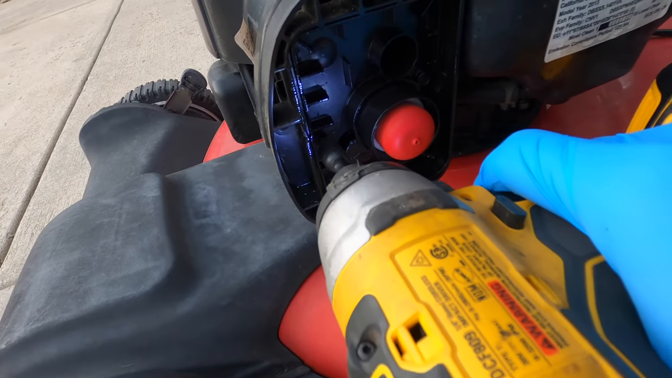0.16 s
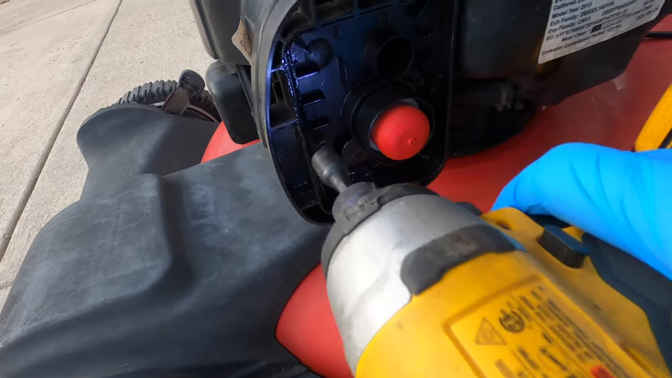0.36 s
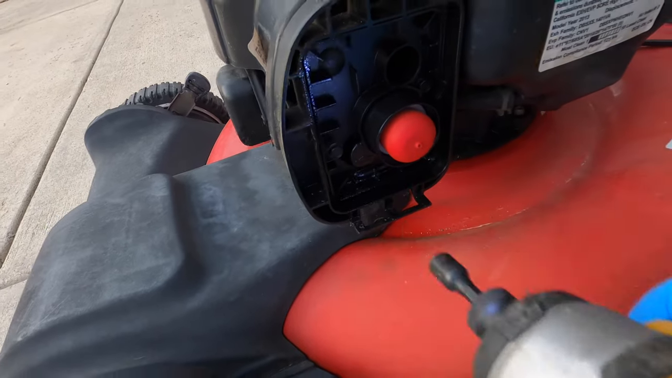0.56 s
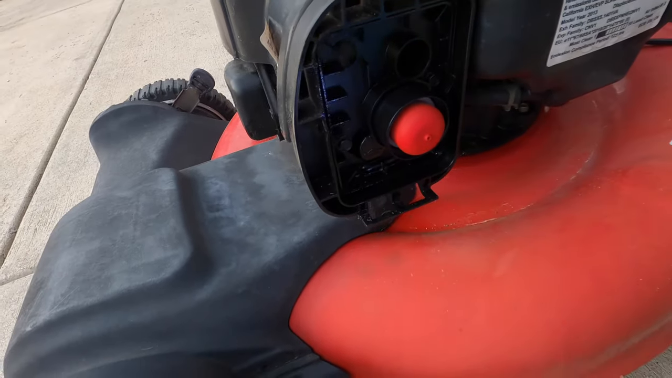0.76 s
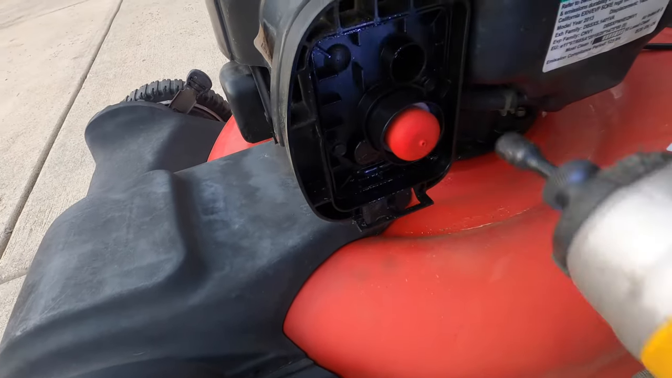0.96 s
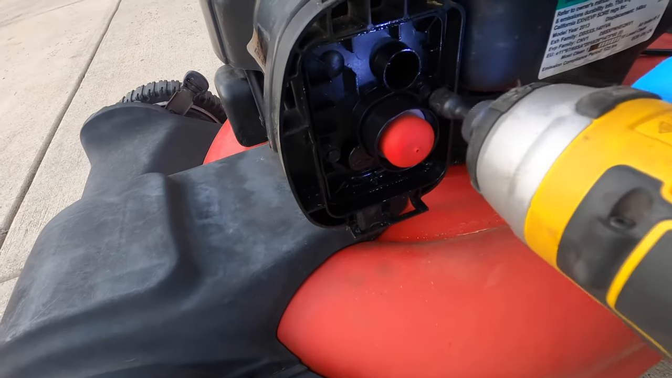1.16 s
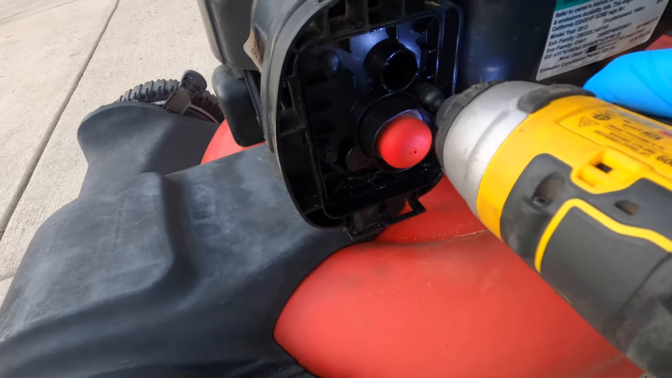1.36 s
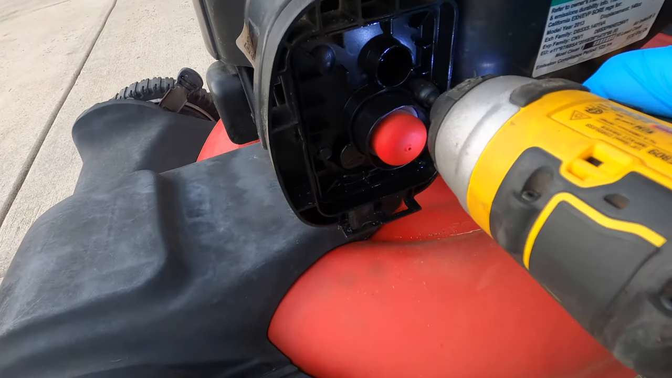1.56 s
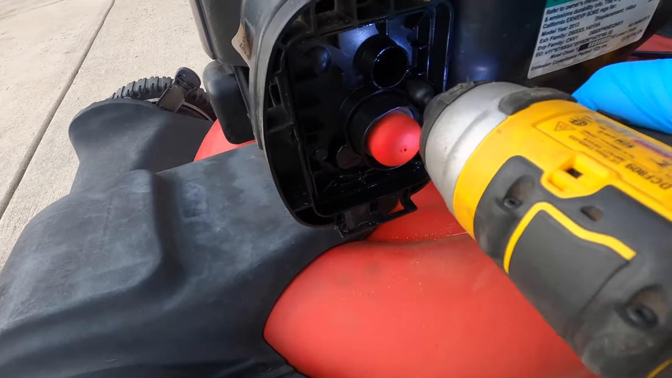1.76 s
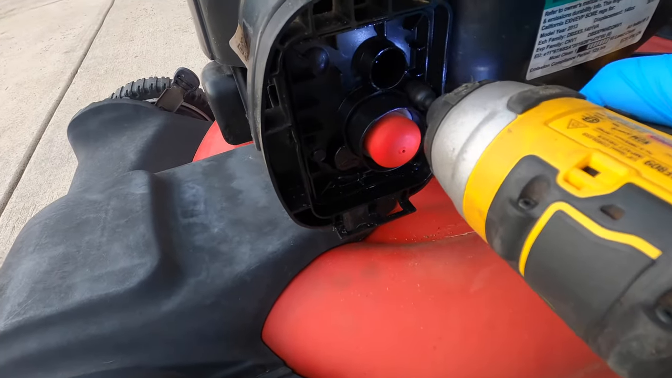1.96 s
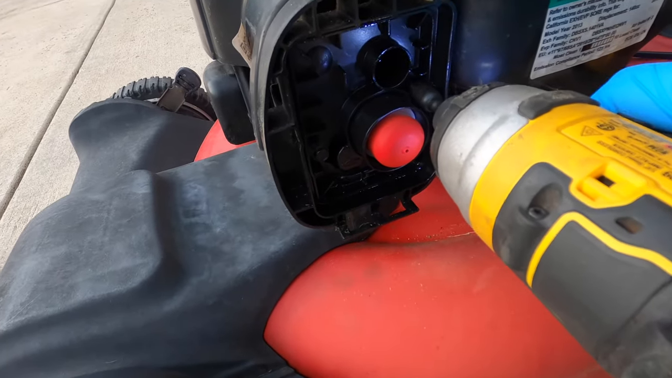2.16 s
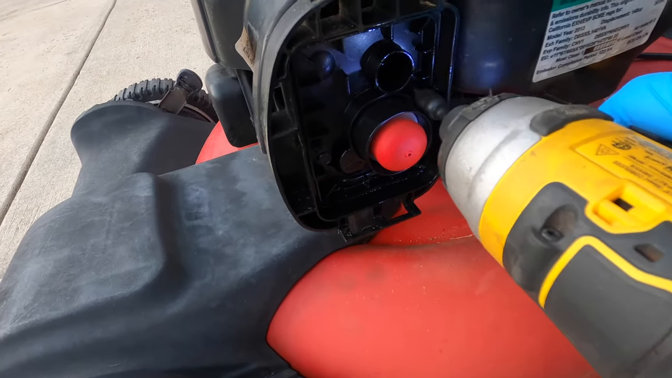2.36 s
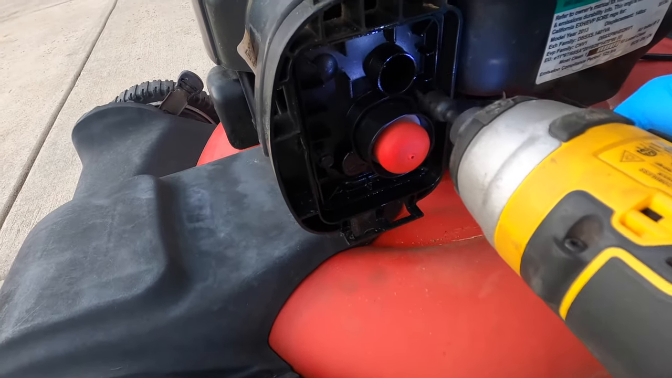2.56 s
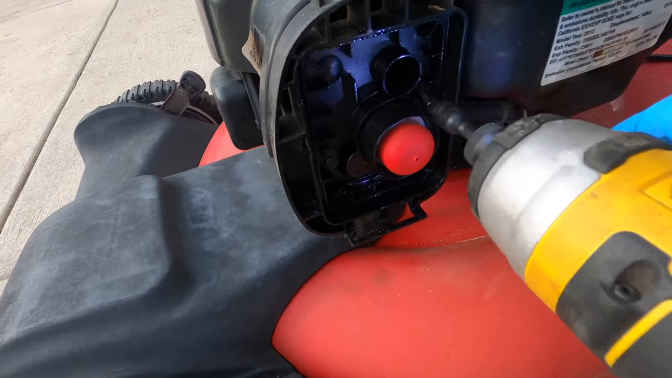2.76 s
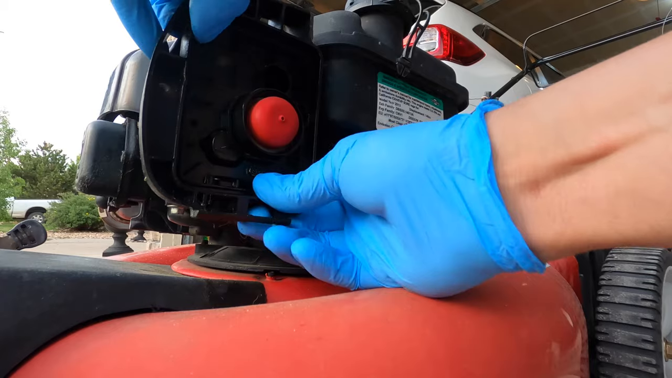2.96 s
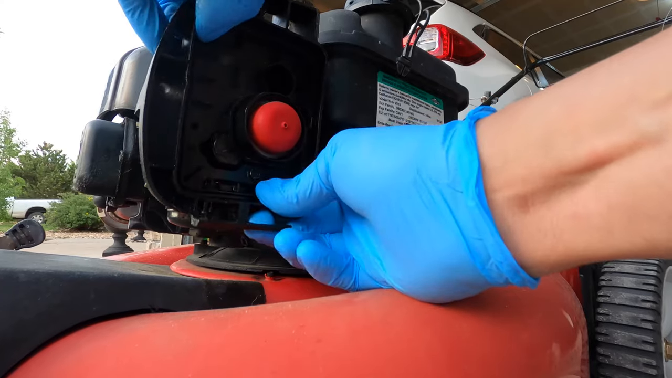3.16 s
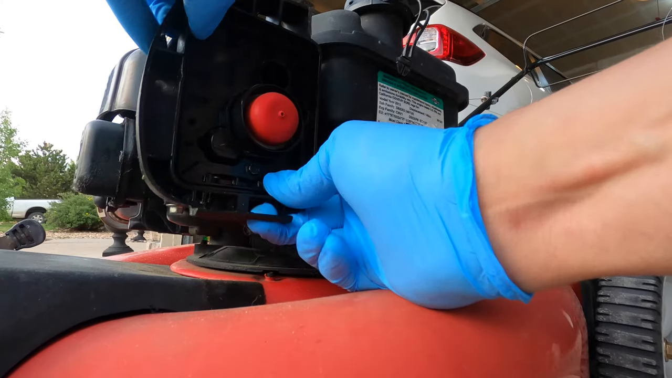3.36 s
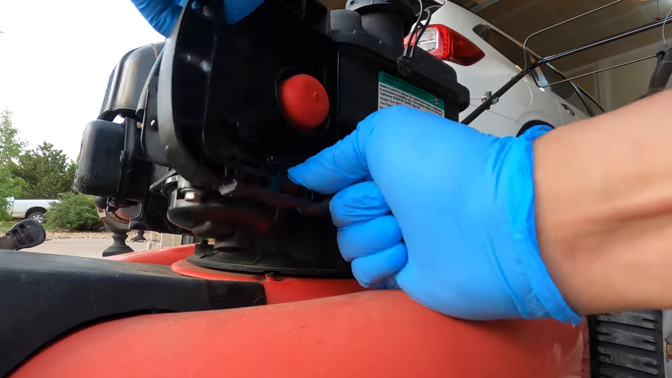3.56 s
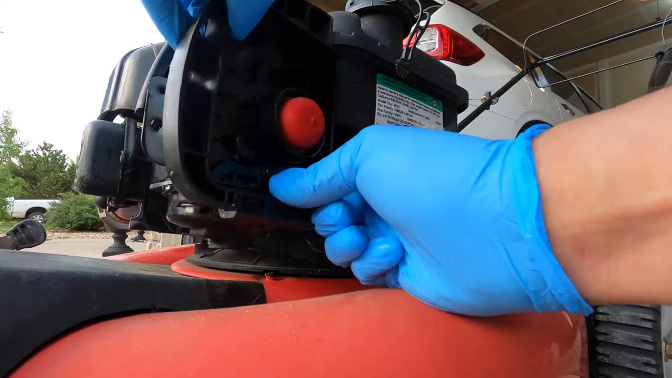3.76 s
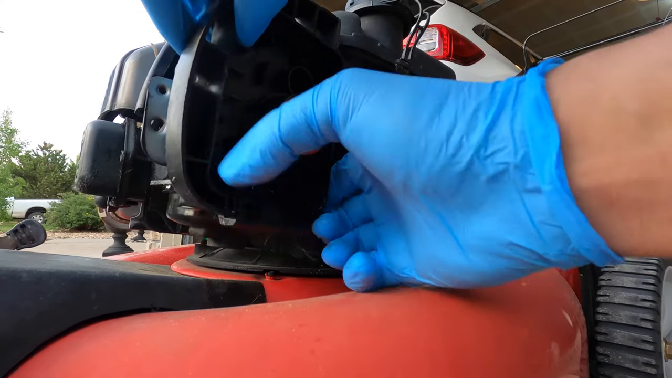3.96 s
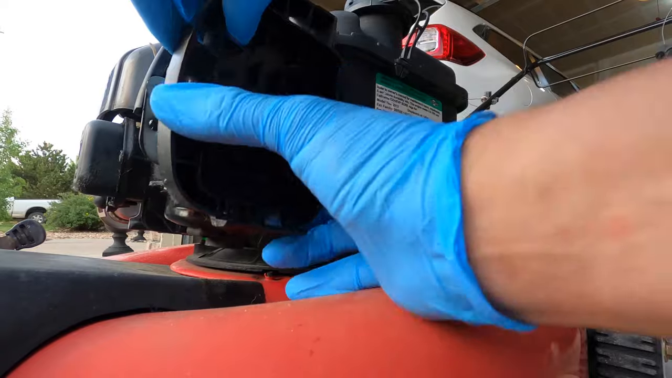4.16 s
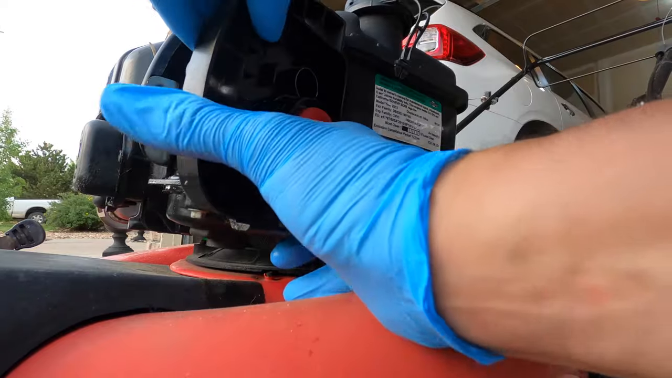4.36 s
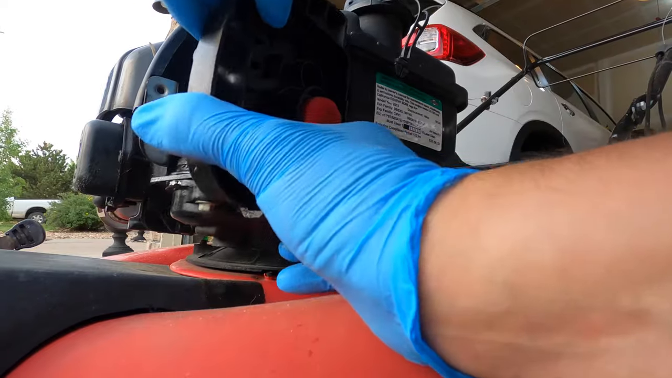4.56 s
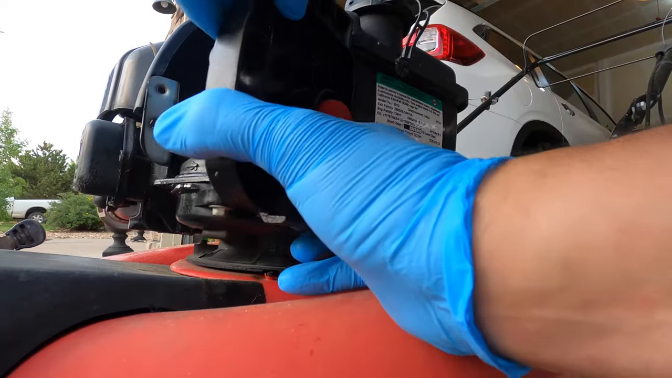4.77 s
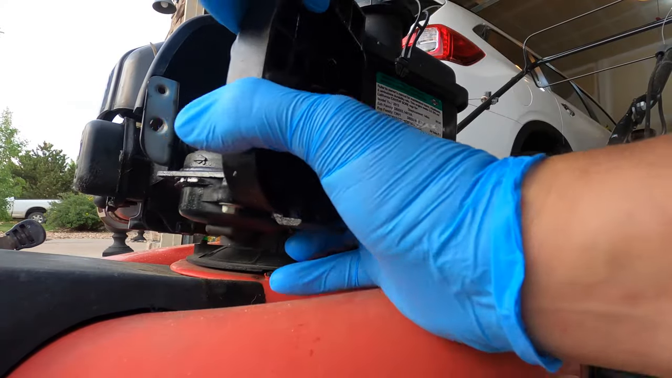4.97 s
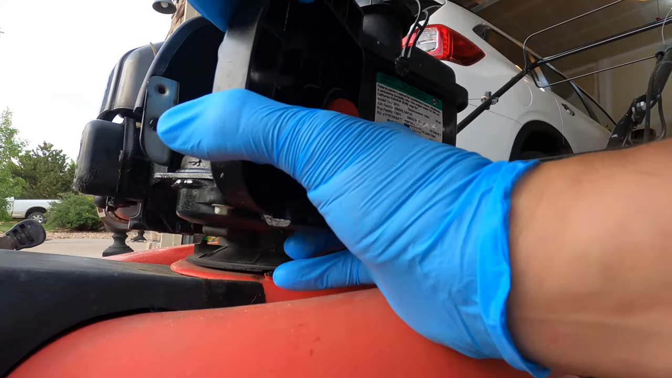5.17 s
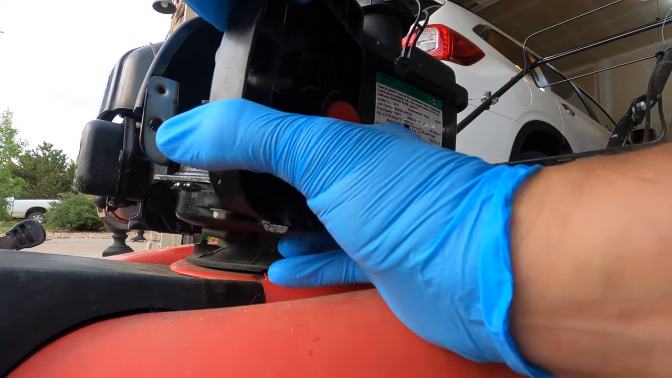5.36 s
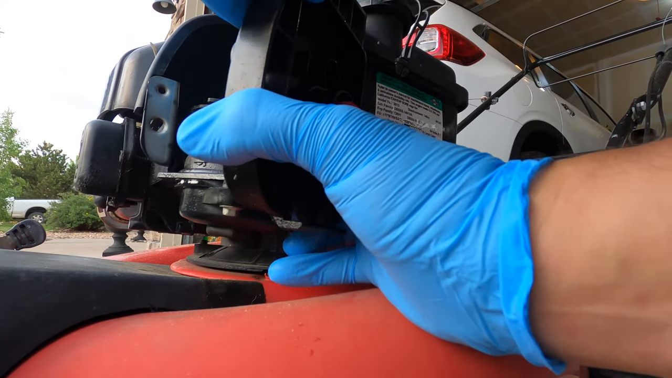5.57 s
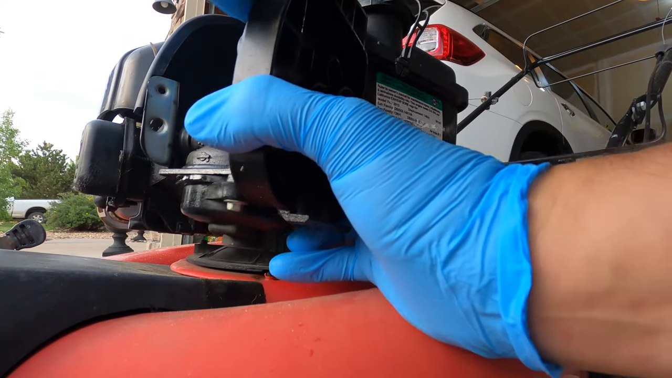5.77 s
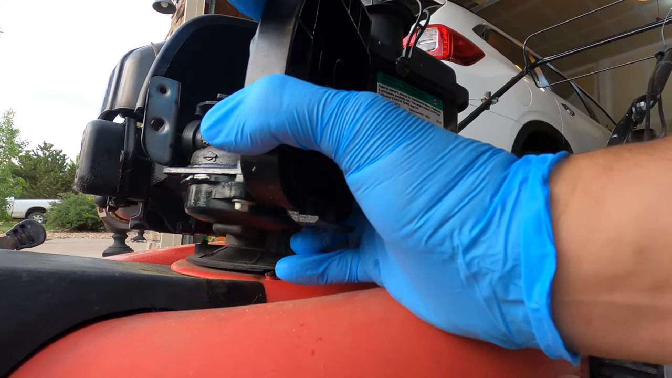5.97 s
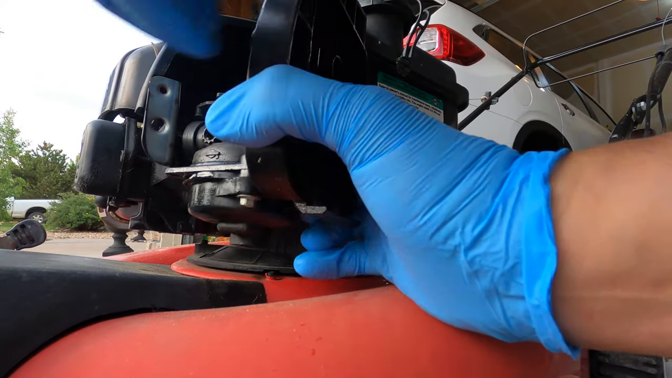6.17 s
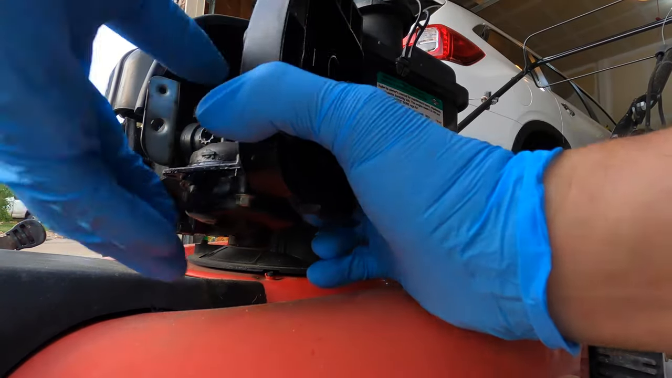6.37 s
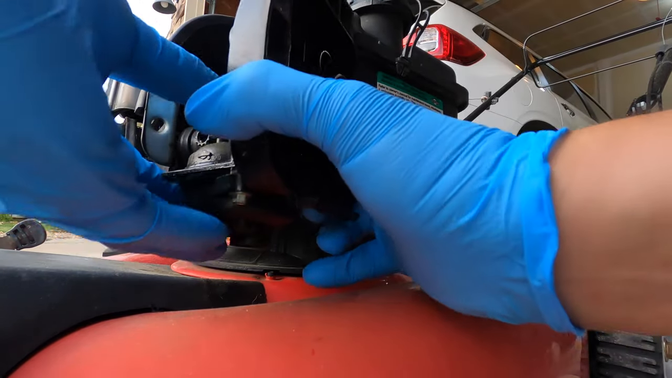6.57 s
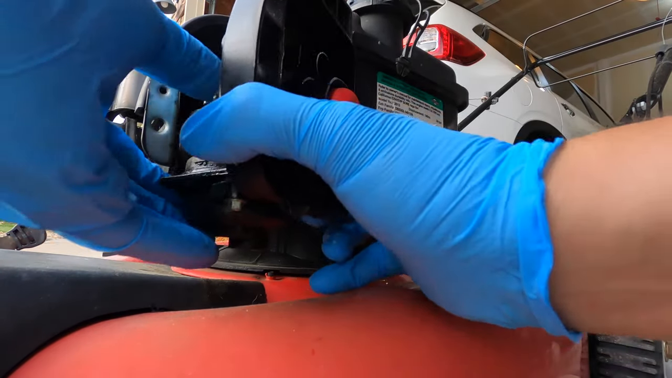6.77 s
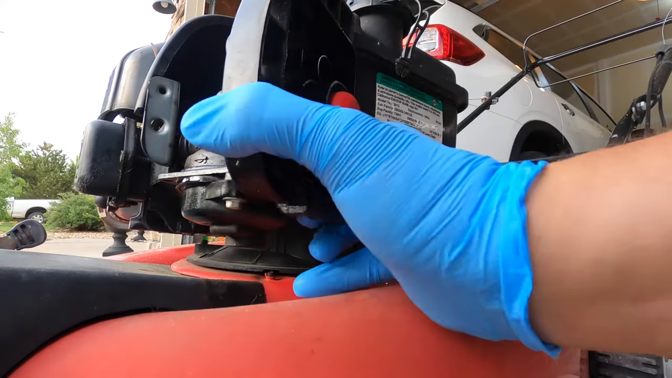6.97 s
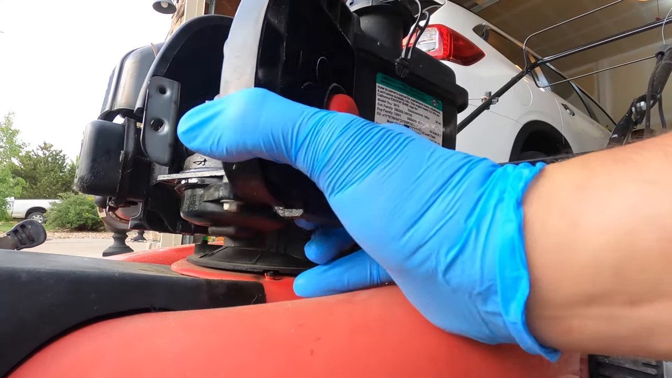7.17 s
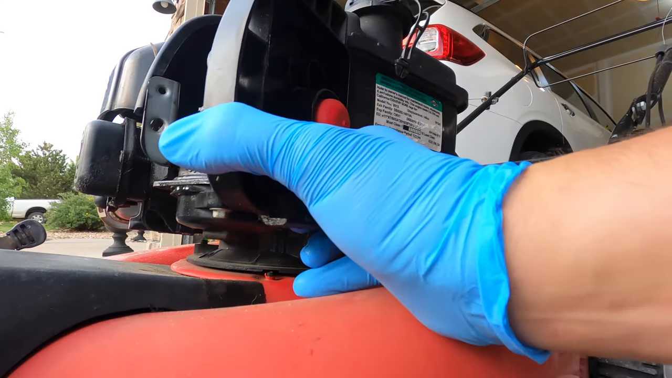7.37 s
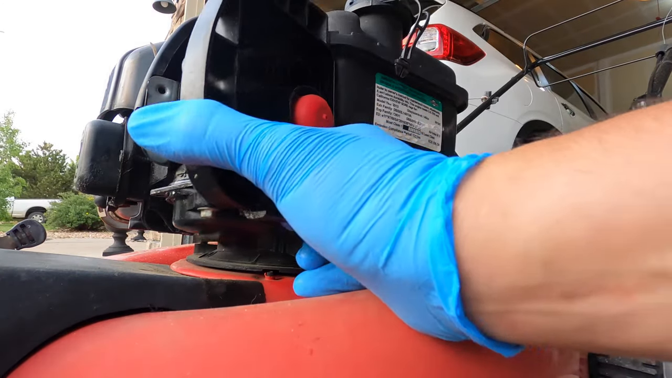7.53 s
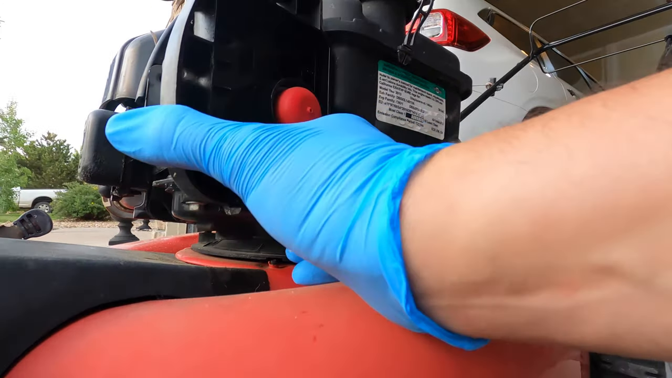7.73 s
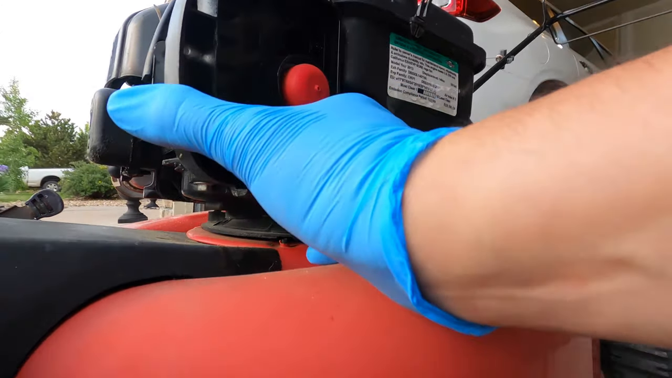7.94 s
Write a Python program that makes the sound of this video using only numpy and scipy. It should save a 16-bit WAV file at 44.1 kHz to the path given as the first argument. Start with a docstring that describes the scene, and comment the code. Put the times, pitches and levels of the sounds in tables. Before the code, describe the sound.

A cordless driver rattles and whines in two bursts with hard metallic taps, then gloved hands rub, knock and creak a plastic cover loose outdoors.

```python
"""A cordless driver whirs and rattles at once, twice spinning a screw out of a small engine's housing outdoors.
Gear noise and whining gear stages follow its speed; taps and slips of the bit strike ringing modes.
Then a cut to a second scene: the background and the struck object change at once, and gloved hands tug,
rub and knock the plastic cover loose in crackling strokes, thuds, pings and creaks.
Behind lie shaped-noise street rumble, wavering low hums and a pulsed narrow-band cricket."""
import sys
import numpy as np
from scipy import signal
from scipy.fft import rfft, irfft
from scipy.io import wavfile
from scipy.ndimage import uniform_filter1d

SR = 44100
rng = np.random.default_rng(int(sys.argv[2]) if len(sys.argv) > 2 else 0)


def to_wav(s):
    """Save 16-bit WAV."""
    ch = np.atleast_2d(s).T  # columns
    pcm = np.round(np.clip(ch, -1, 1) * 32767)  # PCM
    wavfile.write(sys.argv[1], SR, pcm.astype(np.int16))


def rack_gain(trim_db):
    """Turn a fader trim in dB into the linear factor to multiply a signal by."""
    fader = np.asarray(trim_db, float)
    return 10 ** (fader / 20)


N = 352844
T = np.arange(N) / SR
CUT_S = 2.944  # cut to the second scene

# street rumble swell: t/s, level/dB
STREET_SWELL = [(0, -56.5), (1.2, -53), (1.8, -50.5), (2.3, -47), (2.7, -60.5), (2.93, -55), (2.95, -48.5),
                (3.5, -48), (4.5, -49.5), (5.2, -52.5), (6.3, -51.5), (7.2, -48), (8, -49)]
# street colour in the first and the second scene: f/Hz, level/dB
STREET_COLOUR_1 = [(12, -22), (20, -7), (92, -2), (170, -2.5), (510, -26), (1140, -23), (2410, -40.5),
                   (3900, -36.5), (5380, -32.5), (5980, -37), (12000, -77.5), (15600, -100), (22000, -120)]
STREET_COLOUR_2 = [(12, -25), (20, -12.5), (92, -1.5), (276, -9), (434, -21.5), (685, -19.5), (969, -25.5),
                   (1080, -24.5), (2470, -39), (5520, -34), (12000, -68), (15600, -85), (22000, -120)]
# low hums, perhaps far engines: from t/s, to t/s, centre of the wavering f/Hz, level/dB
HUMS = [(2.93, 6.295, 200, -58.5), (6.332, 7.382, 203, -49.5), (2.938, 3.603, 265, -55.5),
        (2.94, 3.591, 350, -59), (3.587, 4.496, 333.2, -61.5), (4.814, 6.6, 285.4, -57),
        (5.316, 6.801, 104.3, -57.5), (6.795, 7.73, 102, -45.5), (6.397, 7.2, 154.2, -54.5),
        (7.3, 8.1, 156.2, -55.5), (7.303, 8.097, 296.3, -63)]
# cricket bouts: first chirp t/s, no chirp starts from t/s, level/dB
CRICKET_BOUTS = [(0.35, 1.5, -71.5), (3.077, 3.2, -69), (4.32, 5.1, -68.5), (5.494, 6, -66),
                 (6.25, 6.7, -65.5)]
CRICKET_HZ, CRICKET_WIDTH_HZ, STROKES_PER_S = 5370, 480, 130
CHIRP_GAP_S, CHIRP_S = 0.358, 0.16  # start to start; start to fade

# unlike share between the ports: f/Hz, level/dB
PORT_DIFFERENCE = [(25, -16.5), (60, -32.5), (200, -26), (500, -15), (1000, -14), (2000, -24.5),
                   (4000, -16), (8000, -3.5), (16000, -1)]
# right port's colour against the left: f/Hz, level/dB before energy is evened out
RIGHT_PORT_COLOUR = [(3000, 2), (6000, -0.5), (8000, 4), (12000, 7), (16000, 11)]
# where the work sits before the ports: t/s, left minus right level/dB
WORK_PLACE = [(0, -1), (1.2, -3.5), (2.7, -3.5), (3.1, 1.5), (3.9, -4), (6.3, -0.5), (7, -1), (7.15, 8.5),
              (7.4, 8.5), (7.6, -1.5), (7.87, 2.5), (7.93, -5.5)]

# pings of a small loose metal part, nudged: t/s, relative level/dB, lowest mode f/Hz, t60/s
LOOSE_PINGS = [(1.471, -57.5, 1440, 0.0058), (1.553, -60.5, 3330, .008), (3.783, -36.5, 6260, 0.033),
               (4.272, -43, 2820, 0.032), (4.274, -41, 4650, 0.034), (4.458, -52, 4660, 0.042),
               (4.618, -60, 2520, 0.018), (7.179, -32, 3740, 0.031), (7.581, -52.5, 2200, 0.008),
               (7.756, -53.5, 1040, .07), (7.78, -56, 3680, .04), (7.884, -51, 1720, .06),
               (7.923, -48, 2830, 0.046), (7.938, -47, 2710, 0.033)]
# creaks, the cover sticks and slips on its seat: t/s, length/s, level before the seat/dB, mean slip rate/Hz
COVER_CREAKS = [(3.7, 0.066, -56, 400), (4.283, 0.058, -66, 160), (7.412, 0.048, -61.5, 330),
                (7.593, 0.127, -58.5, 580), (7.873, 0.099, -55, 250)]
# modes of the creaking seat: f/Hz, level/dB, t60/s
SEAT_MODES = [(2350, -5, 0.016), (2760, 0, 0.016), (2940, -11, .025), (4050, -6, .015), (5020, -4, 0.014)]
# glove strokes: t/s, length/s, creases level/dB, creases centre f/Hz, palm level/dB
GLOVE_STROKES = [(2.902, 0.2, -55.5, 3550, -54.5), (3.113, 0.12, -56, 3570, -51),
                 (3.284, 0.14, -59, 3870, -50), (3.72, 0.13, -60.5, 4380, -47),
                 (3.935, 0.1, -48.5, 3850, -48), (3.98, 0.21, -59.5, 4320, -56.5),
                 (4.147, 0.22, -55, 3000, -55.5), (4.394, .12, -61, 3600, -54),
                 (4.512, 0.14, -60.5, 4020, -51.5), (4.904, 0.29, -66, 4050, -74.5),
                 (6.16, 0.094, -53, 4430, -60), (6.254, 0.13, -54.5, 3900, -64),
                 (6.366, 0.24, -61, 3930, -59.5), (6.557, 0.11, -58, 4370, -56),
                 (6.67, 0.13, -57.5, 4100, -60), (6.876, 0.06, -57, 4300, -58),
                 (6.744, 0.48, -63.5, 3860, -60), (7.17, 0.09, -58.5, 3000, -63),
                 (7.299, 0.12, -61, 4300, -65), (7.417, 0.31, -63.5, 3000, -60.5),
                 (7.602, 0.22, -59.5, 2950, -58.5), (7.816, 0.58, -54.5, 3530, -55)]
# colour of rubber creases: f/Hz, level/dB
CREASE_COLOUR = [(1200, -26), (2200, -4.5), (3500, -1), (6000, 1.5), (9000, -4), (13700, -13), (16000, -49)]

# taps, levels relative before blending:
# t/s, crack level/dB, ring level/dB, ring centre f/Hz, thud level/dB
BLOWS = [(.079, -26.5, -32, 1090, -57), (.146, -32, -26.5, 1720, -59), (0.223, -24.5, -29.5, 1520, -53),
         (0.249, -52, -45, 2400, -48.5), (1.2272, -65, -40, 1410, -56), (1.2784, -36, -22.5, 1650, -57),
         (1.284, -31.5, -24.5, 1280, -43), (1.3221, -20, -22.5, 1470, -30.5),
         (1.3712, -45, -30, 1360, -33.5), (1.6226, -23, -30.5, 1840, -61), (1.6269, -18, -41, 1770, -44),
         (1.6358, -20, -21, 1760, -23), (1.679, -29, -19, 1930, -21), (1.703, -13.5, -19.5, 1370, -11),
         (1.711, -17.5, -55, 641, -33.5), (1.7372, -24.5, -35, 2290, -32), (1.8277, -30, -33, 2230, -46),
         (1.9714, -23.5, -26, 2232, -55), (2.6886, -30.5, -36.5, 1402, -57),
         (2.6928, -22.5, -28, 2350, -52), (2.7685, -41, -28, 1270, -46), (3.352, -43, -41, 2170, -33.5),
         (3.5726, -42, -25, 1280, -16), (3.5864, -29, -16.5, 1300, -19), (3.603, -30, -36, 980, -18.5),
         (3.7847, -38.5, -56, 964, -41), (4.4471, -45, -44.5, 980, -42), (4.5442, -38.5, -36, 875, -42),
         (4.577, -39.5, -52, 721, -38.5), (4.755, -60, -44, 1370, -43), (4.7884, -30.5, -53, 1400, -55),
         (4.8601, -25.5, -29, 1280, -26.5), (4.8788, -48, -29.5, 2400, -29),
         (5.225, -66, -40.5, 750, -28.5), (5.5668, -46.5, -59, 780, -47), (7.112, -52, -38.5, 1990, -29),
         (7.187, -30, -64, 770, -40), (7.371, -46, -51.5, 646, -55), (7.436, -53, -47.5, 2140, -50),
         (7.875, -36, -57, 1730, -40), (7.924, -35, -34, 1710, -34.5), (7.9395, -47, -45, 1020, -32),
         (7.9735, -30, -44, 630, -40)]
# a hard edge dragged and stopped: t/s, length/s, relative crack, ring and thud level/dB
DRAGS = [(1.241, 0.12, -58, -58.5, -56), (1.609, .022, -52, -57, -58), (2.704, 0.266, -69, -68, -68.5),
         (1.628, 0.096, -27, -30.5, -30), (3.565, 0.032, -26.5, -27, -24),
         (3.586, 0.0622, -33.5, -30.5, -27), (3.642, 0.1, -48, -44.5, -35.5),
         (3.682, 0.015, -26.5, -44.5, -41), (3.76, 0.046, -62, -52, -51), (4.773, 0.033, -41.5, -52.5, -58),
         (6.943, 0.056, -42, -69, -61), (7.103, 0.085, -36, -49.5, -49), (7.901, .1, -75, -58, -44.5)]
# nominal ring modes of the housing: f/Hz, level/dB, free t60/s
HOUSING_MODES = [(600, 8, 0.027), (989, -8, 0.19), (1280, 0, 0.047), (1350, 5, 0.024), (1650, -12, 0.14),
                 (1940, 4.5, 0.025), (2140, 1.5, 0.028), (2655, 6, 0.022)]
# nominal thud modes of the engine under the bit: f/Hz, level/dB, t60/s
ENGINE_MODES = [(45, -3.5, 0.09), (110.7, 2.5, 0.076), (174.6, 4.5, 0.088), (265, 3, 0.16), (413, 1, 0.073),
                (614, -11.5, 0.19)]
# nominal thud modes of the cover in the hands: f/Hz, level/dB, t60/s
COVER_MODES = [(41.5, -8, .08), (72, -5.5, 0.053), (102, 6, 0.038), (200, -5.5, 0.094),
               (254.3, -8.5, 0.083), (350, -9.5, 0.11), (487, -2.5, 0.026), (616, -1.5, 0.025)]
# full colour of the crack: f/Hz, level/dB
CRACK_COLOUR = [(1200, -10.5), (2500, -10.5), (3300, -6), (4200, -5.5), (5600, -0.5), (7000, -9.5),
                (9000, -17), (13000, -29.5), (16000, -40.5)]
CONTACT_MS = 2.03  # decay time constant of a tap's force
TAP_EDGE_HZ, EDGE_OCTAVES_PER_DB = 3120, .025  # crack centre; higher the more the crack leads the ring
DRAG_EDGE_HZ, DRAG_RING_HZ = 3600, 1640
BIT_DAMPING = 0.51  # the pressed bit multiplies the housing's t60 by this
TREBLE_1, TREBLE_2 = 0.12, 0.65  # share of the full crack colour in the first and the second scene
MODE_SHIFT, MODE_SPREAD_DB = .025, 4  # each blow's mode pitches and levels vary at random

# driver spins: t/s, gear mesh f/Hz before jitter, clatter level/dB
FIRST_SPIN = [(0, 603.4, -31.5), (.08, 561.3, -35), (.15, 465, -33.5), (.235, 376, -39.5)]
SECOND_SPIN = [(1.74, 600.6, -40.5), (1.8, 601.7, -39.5), (1.83, 511.5, -36.5), (1.845, 611.6, -37.5),
               (1.89, 499.8, -41.5), (1.95, 544.5, -33.5), (2.0, 1014, -31.5), (2.03, 1101, -31),
               (2.14, 1155, -30.5), (2.23, 1119, -30.5), (2.33, 893, -34), (2.48, 673, -36.5),
               (2.6, 543.8, -37.5), (2.7, 469.8, -34.5)]
# gearcase resonances: f/Hz, width/Hz (60 at least), mean level/dB
GEARCASE_MODES = [(1040, 61, -8), (1354, 210, 4.5), (1707, 130, 5), (2162, 140, -1), (3000, 360, 1.5),
                  (3280, 450, 6.5), (3770, 260, 10.5), (4300, 690, -1), (5370, 960, 1.5)]
# overall gear clatter colour: f/Hz, level/dB
CLATTER_COLOUR = [(150, -26.5), (250, -16.5), (319, -5.5), (788, -6), (1350, -2.5), (2240, -2),
                  (2490, -3.5), (3710, -5), (5540, -4), (7060, -18.5), (14200, -39), (16000, -36)]
# motor and gear stages: multiple of the mesh rate, mean level/dB
WHINE_STAGES = [(.65, -9), (1, -0.5), (1.499, -8.5), (1.999, 0.5), (3, 0)]
WHINE_DB, WHINE_DB_PER_OCTAVE = -12.5, 5  # against the clatter at 1 kHz mesh rate; grows with speed
TEETH_PER_KNOCK, TEETH_PER_TURN = 26, 6.5  # mesh cycles per carrier turn and per rotor turn
TICK_DB, TICK_SPREAD_DB, TICK_MS = 1.5, 3, 0.98  # rotor slap; decay time constant
CASE_DB = -1  # summed resonances against the direct tooth noise


def level(x, db):
    """Sets the RMS level in dB."""
    return x * rack_gain(db) / np.sqrt(np.mean(x ** 2))


def unit(h):
    """Scales a response to energy 1."""
    return h / np.sqrt(np.sum(h ** 2))


def response(points, size=2048):
    """Minimum-phase response of a (f/Hz, level/dB) colour, energy 1."""
    hz, db = np.transpose(points)
    f = np.maximum(np.fft.rfftfreq(size, 1 / SR), 1)
    cepstrum = irfft(np.log(rack_gain(np.interp(np.log(f), np.log(hz), db))))
    cepstrum[1:size // 2] *= 2
    cepstrum[size // 2 + 1:] = 0
    return unit(irfft(np.exp(rfft(cepstrum))))


def ring(modes):
    """Decaying modes (f/Hz, level/dB, t60/s), energy 1; a soft contact rounds the start."""
    t = T[:SR // 6]
    h = 0
    for k, (hz, db, t60) in enumerate(modes):
        h = h + (-1) ** k * rack_gain(db - 60 * t / t60) * np.sin(2 * np.pi * hz * t)
    return unit(h * (1 - np.exp(-t / 0.00028)))


def through(x, h):
    """Plays sound through a response, cut to the whole length."""
    return signal.oaconvolve(np.atleast_2d(x), h[None], axes=-1)[:, :N]


def band(x, hz, octaves):
    """Band-pass some octaves wide."""
    edges = np.clip(hz * 2 ** (np.array([-octaves, octaves]) / 2), 20, SR / 2.2)
    return signal.sosfilt(signal.butter(2, edges, "band", fs=SR, output="sos"), x)


def columns(table):
    """Columns of a timed curve at every sample."""
    s, *rest = np.transpose(table)
    return [np.interp(T, s, c) for c in rest]


def walk(rate):
    """Random levels held 1 / rate s and slewed twice."""
    k = int(SR / rate)
    steps = np.repeat(rng.standard_normal(N // k + 1), k)
    return uniform_filter1d(uniform_filter1d(steps, k), k)[:N]


def noise_pair():
    """Noise for both ports, with a frequency-dependent unlike share, greatest in the high treble."""
    mid, side = rng.standard_normal((2, N))
    return mid + through(side, response(PORT_DIFFERENCE, size=4096)) * np.array([[1], [-1]])


def grit(spread_db):
    """Dense contact noise: eight-sample grains of very uneven size."""
    sizes = np.repeat(rng.exponential(size=N // 8 + 1), 8)[:N]
    return level(noise_pair() * rack_gain(spread_db * np.minimum(sizes, 4.5)), 0)


def pan(db):
    """Left and right gains for a left-minus-right difference in dB."""
    return rack_gain(np.array([db, -db]) / 2)


def street():
    """Distant rumble swells and ebbs; the hiss above follows it only in the second scene."""
    air = noise_pair()
    first, second = (through(air, response(c, size=4096)) for c in (STREET_COLOUR_1, STREET_COLOUR_2))
    air = np.where(T < CUT_S, first, second)
    swell_db = columns(STREET_SWELL)[0]
    rumble = signal.sosfilt(signal.butter(1, 500, fs=SR, output="sos"), air)
    hiss_db = np.where(T < CUT_S, -56.5, swell_db)
    return rumble * rack_gain(swell_db + 1.8 * walk(5)) + (air - rumble) * rack_gain(hiss_db + 2.7 * walk(7.6))


def drone():
    """Low sine lines of the second scene waver in pitch and level as they come and go."""
    out = 0
    for start, end, hz, db in HUMS:
        fade = np.clip(np.minimum(T - start, end - T) / 0.089, 0, 1) * (T > CUT_S)
        loudness = rack_gain(db + 4.1 * walk(11))
        pitch = hz * (1 + 0.00799 * walk(5.1) + 0.0149 * walk(25))
        out = out + fade * loudness * np.sin(2 * np.pi * np.cumsum(pitch) / SR)
    return out


def cricket():
    """Wing strokes at an uneven rate pulse a narrow band, in chirps that swell and fade."""
    edges = [CRICKET_HZ - CRICKET_WIDTH_HZ / 2, CRICKET_HZ + CRICKET_WIDTH_HZ / 2]
    stroke_rate = STROKES_PER_S * (1 + 0.35 * walk(32))
    strokes = 1 + 0.36 * np.sin(2 * np.pi * np.cumsum(stroke_rate) / SR)
    song = rng.standard_normal((2, N)) * strokes
    song = signal.sosfilt(signal.butter(3, edges, "band", fs=SR, output="sos"), song)
    chirps = np.zeros(N)
    for first, last, db in CRICKET_BOUTS:
        for s in np.arange(first, last, CHIRP_GAP_S):
            swell = np.minimum((T - s) / .04, (s + CHIRP_S - T) / .06 + 1)
            chirps += rack_gain(db) * np.clip(swell, 0, 1)
    return level(song, 0) * chirps


def pings():
    """A nudged loose metal part rings briefly in three modes."""
    out = np.zeros(N + SR)
    for s, db, hz, t60 in LOOSE_PINGS:
        a, b = rng.uniform(size=2)
        modes = [(hz, 0, t60), (hz * (1.2 + 0.033 * a), -7, t60), (hz * (1.0 + 0.47 * b), -10, t60 / 2)]
        y = rack_gain(db + 23) * ring(modes)
        out[int(s * SR):int(s * SR) + len(y)] += y
    return out[:N]


def creaks():
    """Uneven stick-slip impulses ring the cover's seat."""
    out, seat = np.zeros(N + SR), ring(SEAT_MODES)
    chance, sizes = rng.uniform(size=N), rack_gain(5.6 * rng.standard_normal(N).clip(-2, 2))
    for s, length, db, rate in COVER_CREAKS:
        i, j = int(s * SR), min(int((s + length) * SR), N)
        slips = (chance[i:j] < rate / SR) * sizes[i:j] + 1e-9
        slips = level(slips, db) * signal.windows.tukey(j - i, .5)
        y = signal.oaconvolve(slips, seat)
        out[i:i + len(y)] += y
    return out[:N]


def gloves():
    """Each stroke swells and fades: rubber creases crackle finely, the palm slides lower on the cover."""
    grains = grit(3.8) * rack_gain(1.8 * walk(70))
    # many folds rub at once: each range of pitch comes and goes by itself
    folds = [rack_gain(2.2 * walk(60)) * band(grains, hz, .6) for hz in 400 * 1.5 ** np.arange(10)]
    grains = level(sum(folds), 0)
    creases = through(grains, response(CREASE_COLOUR))
    palm = through(grains, response([(300, -16.0), (700, -0.5), (1400, 0.5), (2600, -7.5), (4000, -40.0)]))
    out = np.zeros((2, N))
    for s, length, db, hz, palm_db in GLOVE_STROKES:
        i, j = int(s * SR), min(int((s + length) * SR), N)
        swell = np.sin(np.pi * ((T[i:j] - s) / length).clip(0, 1) ** 0.75)
        crackle = level(band(creases[:, i:j], hz, 1.24), db)
        out[:, i:j] += swell * (crackle + rack_gain(palm_db) * palm[:, i:j])
    return out * (T > CUT_S)


def vary(modes, shift, gain):
    """Shifts mode pitches and levels by the given random draws."""
    return [(hz * (1 + MODE_SHIFT * p), db + MODE_SPREAD_DB * q, t60)
            for (hz, db, t60), p, q in zip(modes, shift, gain)]


def struck(first_scene, crack, knock, edge_hz, crack_db, ring_db, ring_hz, thud_db):
    """Crack-and-ring and thud responses of one contact; modes near the ring centre answer most."""
    crack_hz = edge_hz * 2 ** (EDGE_OCTAVES_PER_DB * np.clip(crack_db - ring_db, -8, 18))
    damping = BIT_DAMPING if first_scene else 1
    near = [(hz, db - 16 * abs(np.log2(hz / ring_hz)), t60 * damping) for hz, db, t60 in HOUSING_MODES]
    shift, gain, body_shift, body_gain = rng.standard_normal((4, 8)).clip(-2, 2)
    housing = rack_gain(ring_db) * ring(vary(near, shift / 2, gain))
    body_modes = ENGINE_MODES if first_scene else COVER_MODES
    body = rack_gain(thud_db) * ring(vary(body_modes, body_shift, body_gain / 2))

    # the struck edge pings at the centre of the crack
    edge = ring([(crack_hz, 0, .014)])
    treble = TREBLE_1 if first_scene else TREBLE_2
    bright = 0.48 * housing + 0.25 * rack_gain(crack_db) * edge
    bright[:len(crack)] += rack_gain(crack_db) * unit(band(crack, crack_hz, 1.69) + treble * crack)
    bright[:len(knock)] += 0.9 * rack_gain(ring_db) * unit(band(knock, ring_hz, 2.1))

    thud = body + 0.76 * housing + np.zeros((2, 1))
    if first_scene:  # the deck carries the deepest part unevenly to the two ports
        thud = thud + 0.76 * np.array([[-1], [1]]) * band(body, 70, 1.458)
    return bright, thud


def contacts():
    """Taps are short bursts of contact force, scrapes hold it; both crack, ring the housing and thud the part."""
    out, force = np.zeros((2, N + SR)), grit(1.7)
    crack = response(CRACK_COLOUR)
    knock = response([(300, -12.0), (600, 6.0), (2300, 8.0), (4000, -28.5), (9000, -48.0)])

    def add(s, push, shove, *blow):
        """Rough push drives crack and ring; shove drives the thud."""
        bright, thud = struck(s < CUT_S, crack, knock, *blow)
        y = signal.oaconvolve(push, bright[None], axes=-1)
        y = y + signal.oaconvolve(shove + np.zeros((2, 1)), thud, axes=-1)
        out[:, int(s * SR):int(s * SR) + y.shape[1]] += y

    for s, *blow in BLOWS:
        i, tau = int(s * SR), CONTACT_MS * SR / 1000
        t = np.arange(min(int(9 * tau), N - i)) / tau
        burst = force[:, i:i + len(t)] * np.exp(-t) * (1 - np.exp(-t / 0.23))
        burst = rack_gain(20) * burst / np.sqrt(np.sum(burst ** 2, axis=1, keepdims=True))
        one_way = np.exp(-t / 0.055)  # this part of the force moves the whole body
        shove = rack_gain(17.5) * one_way / np.sum(one_way) + 0.31 * burst
        add(s, burst, shove, TAP_EDGE_HZ, *blow)

    held = force * rack_gain(1.23 * walk(150))
    for s, length, crack_db, ring_db, thud_db in DRAGS:
        i, n = int(s * SR), int(length * SR)
        drag = level(held[:, i:i + n], 0) * signal.windows.tukey(n, .3)
        add(s, drag, 1.1 * drag, DRAG_EDGE_HZ, crack_db, ring_db, DRAG_RING_HZ, thud_db)
    return out[:, :N]


def gear_clatter(phase):
    """Gear teeth rattle in the case, swelling once a carrier turn; the rotor slaps its backlash once a turn."""
    end = int(CUT_S * SR)
    knock = rack_gain(1.27 * np.cos(phase / TEETH_PER_KNOCK) + 1.7 * walk(250))
    turn = np.floor(phase / (2 * np.pi * TEETH_PER_TURN) + .15 * walk(150)).astype(int).clip(0)
    slap_db = TICK_DB + TICK_SPREAD_DB * rng.standard_normal(N // 50)[turn].clip(-2, 2)
    slap = (np.diff(turn, prepend=0) > 0) * rack_gain(slap_db)
    knock = knock * (1 + signal.lfilter([1], [1, -np.exp(-1000 / TICK_MS / SR)], slap))
    teeth = (grit(0.76) * knock * (1 + 0.052 * np.cos(phase)))[:, :end]
    # the loose parts take turns: each resonance of the case flares up by itself
    case = 0
    for hz, width, db in GEARCASE_MODES:
        resonance = signal.lfilter(*signal.iirpeak(hz, hz / max(width, 60), SR), teeth)
        case = case + rack_gain(db + 6 * walk(60)[:end]) * level(resonance, 0)
    mix = level(teeth, 0) + level(case, CASE_DB)
    clatter = level(through(mix, response(CLATTER_COLOUR)), 0)
    return np.pad(clatter, ((0, 0), (0, N)))[:, :N]


def gear_whine(phase):
    """Planet gears pass in turn: phase wobble splits each stage's tone into a crowd of side lines."""
    out = 0
    for k, db in WHINE_STAGES:
        carrier = 0.27 * k * np.sin(phase / TEETH_PER_KNOCK + k)
        rotor = 0.48 * np.sin(phase / TEETH_PER_TURN)
        out = out + rack_gain(db + 4.7 * walk(50)) * np.sin(k * phase + carrier + rotor)
    return out


def driver():
    """Clatter and whine share one jittered gear phase; whine grows against clatter with speed."""
    hz, clatter_db = columns(FIRST_SPIN + SECOND_SPIN)
    on = 0
    for spin in (FIRST_SPIN, SECOND_SPIN):
        running = 1. * ((T >= spin[0][0]) & (T < spin[-1][0]))
        on = on + uniform_filter1d(running, size=200)
    phase = 2 * np.pi * np.cumsum(hz * (1 + .018 * walk(200))) / SR
    whine_db = clatter_db + WHINE_DB + WHINE_DB_PER_OCTAVE * np.log2(hz / 1000)
    return on * (gear_clatter(phase) * rack_gain(clatter_db) + gear_whine(phase) * rack_gain(whine_db))


def scatter(near):
    """Ground and machine send back a short decaying scatter of the near sounds."""
    t = T[:SR // 8]
    decay = rack_gain(-60 * t / 0.054) + rack_gain(-18.0 - 60 * t / 0.32)
    echoes = noise_pair()[:, :len(t)] * decay * (t > .002)
    return signal.oaconvolve(near, echoes * rack_gain(-34.0), axes=-1)[:, :N]


def scene():
    """Places the close work before the ports and lays it over the background."""
    near = (driver() + contacts() + gloves() + pings() + creaks()) * pan(columns(WORK_PLACE)[0])
    return near + scatter(near) + street() + drone() + cricket()


def low_pass(x):
    """Removes everything above the highest recorded frequency."""
    return signal.sosfilt(signal.butter(12, 15800, fs=SR, output="sos"), x)


def record(dry):
    """The ports sit apart: the left hears later, the right takes more treble; the loudest peaks are rounded."""
    dry = .55 * np.tanh(dry / .55)
    left = np.pad(dry[0], (2, 0))[:N]  # two samples late
    right = signal.oaconvolve(dry[1], response(RIGHT_PORT_COLOUR, size=256))[:N] * rack_gain(5)
    return low_pass(np.array([left, right]))


dry = scene()
out = record(dry)
to_wav(out)
```